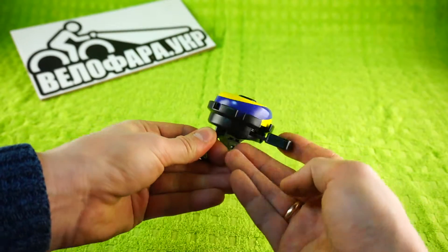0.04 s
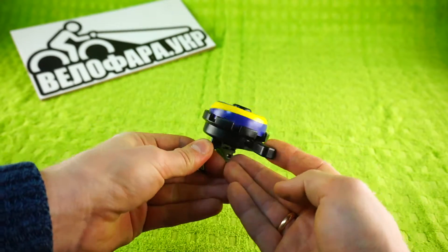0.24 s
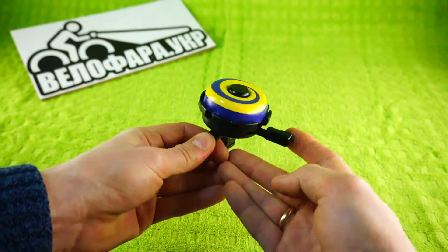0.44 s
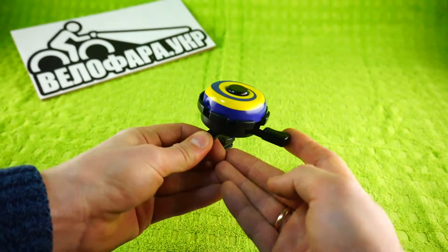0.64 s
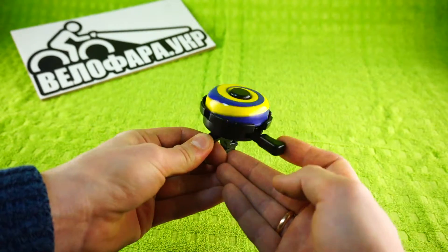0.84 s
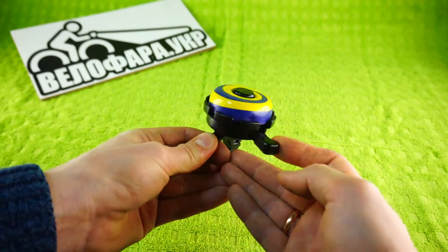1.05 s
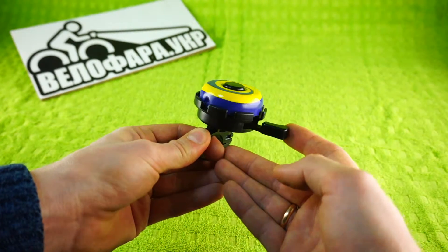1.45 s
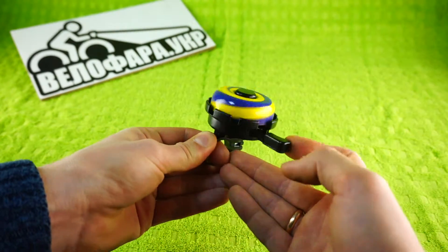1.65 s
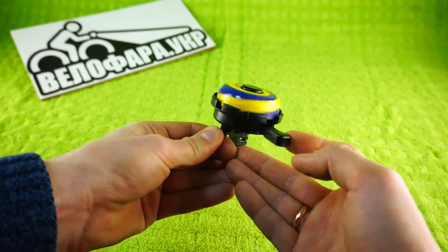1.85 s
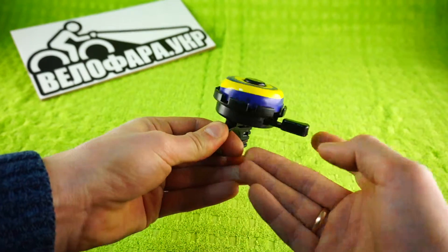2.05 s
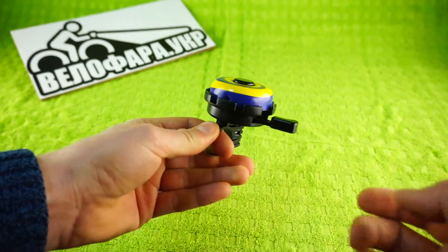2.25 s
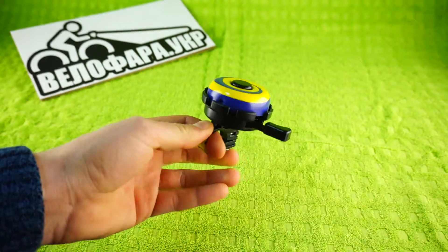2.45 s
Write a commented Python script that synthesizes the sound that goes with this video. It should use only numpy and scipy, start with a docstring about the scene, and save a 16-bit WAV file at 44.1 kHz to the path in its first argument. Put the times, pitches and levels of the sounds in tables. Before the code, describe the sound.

A small bicycle bell is rung three times by hand. Each push and return of the lever clacks and rattles the gears, setting off a bright, fluttering metallic ring, close to the microphone in a quiet room.

```python
"""A lever clacks and gear teeth rattle, then a small rotary bicycle bell rings out, three times in all,
hand-held in a quiet room. The lever spins the dome one way and its spring spins it back while a striker
hits it; the dome's tones flutter as their lobes turn past the microphones. The plastic housing colours
the clacks and scrapes, and a finger stills the dome before the third ring."""
import sys
import numpy as np
from scipy import signal
from scipy.fft import rfft, irfft, next_fast_len
from scipy.io import wavfile

SR = 44100
rng = np.random.default_rng(int(sys.argv[2]) if len(sys.argv) > 2 else 0)


def transcribe(signal):
    """Save signal, clipped to [-1, 1], as a 16-bit WAV file at the path in sys.argv[1]."""
    frames = np.atleast_2d(signal).T
    limited = np.clip(frames, -1, 1)
    pcm = np.round(limited * 32767).astype(np.int16)
    wavfile.write(sys.argv[1], SR, pcm)


N = 110250
TIME = np.arange(N) / SR


def from_db(db):
    """Decibels to gain."""
    return 10 ** (np.asarray(db) / 20)


def pan(db):
    """Left and right gains, the left louder by db."""
    return from_db(np.array([[db], [-db]]) / 2)


def stereo_noise(correlation):
    """White noise, partly shared by both channels."""
    mid, side = rng.standard_normal((2, N))
    spread = np.sqrt(1 - correlation) * side * np.array([[1], [-1]])
    return (np.sqrt(1 + correlation) * mid + spread) / np.sqrt(2)


def colour(x, eq):
    """Minimum-phase EQ that keeps the power of white noise."""
    size = next_fast_len(2 * N)
    hz, db = np.transpose(eq)
    bin_hz = np.arange(size // 2 + 1) * SR / size
    gain = from_db(np.interp(np.log(bin_hz + 1), np.log(hz), db))
    cepstrum = irfft(np.log(gain / np.sqrt(np.mean(gain ** 2))), size)
    cepstrum[1:size // 2] *= 2
    cepstrum[size // 2 + 1:] = 0
    return irfft(rfft(x, size) * np.exp(rfft(cepstrum)), size)[..., :N]


def hit_envelope(times, db, t60):
    """Amplitude of a vibration whose energy is topped up by each hit and then dies away."""
    energy = np.zeros(N)
    np.add.at(energy, np.clip((times * SR).astype(int), 0, N - 1), from_db(db) ** 2)
    decay = np.exp(-2 * np.log(1000) / (t60 * SR))
    return np.sqrt(signal.lfilter([1], [1, -decay], energy + 1e-22))


# Tone of the noise floor: (frequency [Hz], relative level [dB])
HISS_EQ = [(100, 5), (1000, -1), (4000, -6.5), (11000, -7)]
def room_hiss():
    """The quiet room's steady, wide bed of hiss."""
    return from_db(-83.5) * colour(stereo_noise(correlation=0.13), HISS_EQ)


def room_reverb(x, t60=0.53, wet_db=-20, predelay_s=0.004):
    """Reflections blur into a faint diffuse tail."""
    t = TIME[:SR // 2]
    tail = rng.standard_normal((2, len(t))) * np.exp(-np.log(1000) * t / t60) * (t > predelay_s)
    tail /= np.sqrt(np.sum(tail ** 2) / 2)
    return from_db(wet_db) * signal.fftconvolve(x, tail, axes=1)[:, :N]


# Fader ride of the hand rustle: (time [s], relative level [dB])
RUSTLE_RIDE = [(0.0, -61), (0.06, -62.5), (0.18, -52), (0.24, -73.5), (0.39, -64), (0.44, -77),
               (0.72, -91.5), (0.88, -68), (0.93, -78.5), (1.34, -94.5), (1.4, -87.5), (2.5, -96)]
# Its bass-heavy tone: (frequency [Hz], relative level [dB])
RUSTLE_EQ = [(25, -28), (70, -16), (135, -9), (160, -9.5), (173, 10.5), (188, -5.5), (270, -1), (400, -16),
             (700, -20), (1500, -17.5), (4000, -35)]
def hand_rustle(trim_db=-2.5):
    """Low rustle of the hands holding the bell."""
    level = from_db(np.interp(TIME, *np.transpose(RUSTLE_RIDE)) + trim_db)
    return level * colour(stereo_noise(correlation=0.74), RUSTLE_EQ)


HOUSING_PAN_DB = -3
# Resonances of the housing: (frequency [Hz], relative level [dB])
HOUSING_EQ = [(100, -48), (650, -35.5), (950, -22), (1250, -16.5), (1500, -1.5), (1750, 10), (2150, -10.5),
              (2600, -10.5), (3100, -23.5), (3600, -23), (3900, -0.5), (4250, -12), (4550, -14),
              (5200, -6.5), (5900, -22.5), (6750, -4.5), (7300, -15), (8700, -9), (9600, -5), (10200, -13),
              (10900, -15.5)]
def housing(x):
    """The plastic shell lends its resonances to the mechanism inside."""
    return colour(x, HOUSING_EQ)


# Lever rubs leading into a strike: (start [s], end [s], end level [dB])
SCRAPES = [(0.109, 0.201, -50), (0.346, .4, -46.5), (.8, .915, -53.5), (1.102, 1.158, -54.5),
           (1.63, 1.72, -53.5)]
def lever_scrapes(swell_db=13, lowpass_hz=2464):
    """Dull friction of the lever in the housing, swelling and then cutting off."""
    level = np.zeros(N)
    for start, end, db in SCRAPES:
        rubbing = (TIME > start) & (TIME < end)
        level[rubbing] += from_db(db - swell_db * (end - TIME[rubbing]) / (end - start))
    lowpass = signal.butter(1, lowpass_hz, fs=SR, output="sos")
    rub = signal.sosfilt(lowpass, housing(stereo_noise(correlation=0.39)))
    return pan(HOUSING_PAN_DB) * level * rub / rub.std()


# Ringing of the small metal parts: (frequency [Hz], level against the clack [dB], t60 [s])
METAL_PARTS = [(4034, -44.5, 0.66), (6860, -46.5, 0.17), (9100, -48, 0.42)]
def metal_parts(clacks, width_hz=250):
    """Each clack shakes clusters of close, weak modes, voiced as narrow bands of noise."""
    times, clack_db, _ = np.transpose(clacks)
    noise = stereo_noise(correlation=0.12)
    radius = np.exp(-np.pi * width_hz / SR)
    out = 0
    for hz, db, t60 in METAL_PARTS:
        resonator = [1, 0, -1, 1, -2 * radius * np.cos(2 * np.pi * hz / SR), radius ** 2]
        cluster = signal.sosfilt([resonator, resonator], noise)
        out += cluster / cluster.std() * hit_envelope(times, clack_db + db, t60)
    return pan(HOUSING_PAN_DB) * out


# Dome speed, one table per push and return of the lever: (time [s], signed speed [turns/s])
FIRST_SPIN = [(0.105, -1), (0.113, 10), (0.23, 11.5), (0.263, 9), (0.29, 0.63), (0.345, -6), (0.422, -23),
              (0.44, -25), (0.476, -3), (0.53, -0.5)]
SECOND_SPIN = [(0.772, 0), (0.827, 0.4), (0.897, 12.5), (0.953, 11), (1.05, -1.44), (1.116, -8),
               (1.225, -23.5), (1.232, -6.5), (1.322, -5), (1.37, -2.2), (1.47, -1.1), (1.6, 0)]
THIRD_SPIN = [(1.66, -0.5), (1.714, 15.5), (1.772, 18), (1.819, -5), (1.938, -17.5), (1.959, -24),
              (1.976, -4.5), (2.08, -1)]
def dome_spins():
    """One speed curve per ring: the lever drives the dome forward, the spring drives it back."""
    return [np.interp(TIME, *np.transpose(rows), left=0, right=0)
            for rows in (FIRST_SPIN, SECOND_SPIN, THIRD_SPIN)]


def gear_ticks(spin, level_db, teeth_per_turn=9, reference_speed=18, scatter_db=6, tilt_db=-6.5):
    """Each passing tooth cues a tick, harder with speed; columns as in CLACKS."""
    speed = np.abs(spin)
    teeth_passed = np.floor(np.cumsum(speed) / SR * teeth_per_turn)
    at = np.flatnonzero(np.diff(teeth_passed))
    scatter, jitter = rng.standard_normal((len(at), 2)).T
    speed_db = 0.54 * 20 * np.log10(speed[at] / reference_speed + 1e-6)
    db = level_db + speed_db + scatter_db * scatter
    return np.column_stack([at / SR + 0.0014 * jitter, db, np.full(len(at), tilt_db)])


# Hits of lever and striker: (time [s], relative level [dB], treble tilt [dB])
CLACKS = [(.1067, -31.5, 4.5), (.1935, -29, -5), (.199, -30, 0), (.208, -30, 0), (.395, -45, -1.5),
          (.402, -32.5, 6), (.413, -61, 4), (.4505, -30, 6.5), (.4618, -25, 7), (.51, -35, 0),
          (.546, -51.5, 5.5), (.778, -42, 0.5), (.792, -43.5, -2), (.9155, -29.5, -2), (1.159, -32, 0),
          (1.2146, -32, 5.5), (1.225, -40.5, 6.5), (1.2535, -35, 4.5), (1.3244, -42.5, 5),
          (1.344, -40.5, 2), (1.398, -55, -2.5), (1.4511, -53, 5.5), (1.535, -56, -6.5),
          (1.565, -52.5, -2.5), (1.625, -47.5, -1.5), (1.719, -31.5, -2), (1.729, -39.5, -2),
          (1.78, -42, -4.5), (1.789, -47.5, 13.5), (1.82, -36, -1), (1.911, -32, 0), (1.963, -28.5, 1.5),
          (1.9784, -28, 7), (2.0687, -52, 7.5), (2.4488, -50, -9.5)]
def clacks_and_rattle(ticks, trim_db=-4, crossover_hz=3500):
    """Every clack and gear tick is a short crack with a weaker ring, heard through the housing."""
    times, db, tilt_db = np.vstack([CLACKS, *ticks]).T
    noise = stereo_noise(correlation=0.53)
    low = signal.sosfilt(signal.butter(1, crossover_hz, fs=SR, output="sos"), noise)
    out = 0
    for band, band_db in ((low, db - tilt_db), (noise - low, db + tilt_db)):
        crack = hit_envelope(times, band_db + trim_db, t60=0.017)
        ring = hit_envelope(times, band_db + trim_db - 9, t60=0.094)
        out += band * np.hypot(crack, ring)
    return pan(HOUSING_PAN_DB) * housing(out)


def waver(depth_db=2.2, rate_hz=7):
    """A tone's level wavers at random, differently in each channel."""
    lowpass = signal.butter(2, rate_hz, fs=SR, output="sos")
    drift = signal.sosfilt(lowpass, rng.standard_normal((2, N + SR)))[:, SR:]
    return from_db(depth_db * (drift - drift.mean(axis=1, keepdims=True)) / drift.std())


def finger_mute(struck_at, touch_s=1.5547, press_s=0.054, loss_db=26):
    """Gain in dB as a finger chokes the dome until the next strike."""
    return -loss_db * np.clip((TIME - touch_s) / press_s, 0, 1) * (struck_at < touch_s)


# The dome's low, middle and high partials: (t60 [s], left gain [dB], left microphone bearing [turns],
# right microphone bearing [turns], reflected sound in the gaps between lobes [signed share])
PARTIALS = [(3.5, 6.5, .124, -0.0096, 0.22), (2.34, -15.5, -0.053, -0.1228, -0.22),
            (0.6, -10, 0.3, 0.257, 0.24)]
# Their pitches, the low one without a twin: (tone [Hz], twin [Hz])
PARTIAL_HZ = [(2002,), (4763.9, 4836), (8153.2, 8317.5)]
WAVES_ROUND_RIM, PARTIAL_TRIM_DB, ATTACK_S = (2, 3, 4), (-2, 1, 1.5), 0.00044
# Slow swells and dips of two partials: (time [s], low gain [dB], middle gain [dB])
SWELLS = [(0.2, -1, -0.5), (0.49, -4.1, 0), (0.652, 3, -1.5), (0.852, 9.5, 5), (0.95, -4, -4.5),
          (1.25, -9, -1.5), (1.472, 2.4, -4.5), (1.55, 2.4, 1), (1.72, 6.1, -3.4), (2.05, -5.7, -1),
          (2.199, -4.6, 5.5), (2.33, 1.5, 3.5), (2.5, 1.6, -2)]
# Striker hits, in relative levels: (time [s], low [dB], middle [dB], twin [dB], high [dB], twin [dB])
STRIKES = [(.199, -40, -26, -25, -20.5, -18.5), (.402, -45.5, -37, -32.5, -25.5, -31),
           (0.461, -36.5, -30.5, -29, -27.5, -26), (.916, -38.5, -26, -23, -30, -24),
           (1.158, -45.5, -33.5, -24.5, -29, -23.5), (1.215, -37.5, -33.5, -27.5, -23.5, -24.5),
           (1.251, -39.5, -25, -38.5, -32.5, -31), (1.72, -53.5, -29.5, -27, -35.5, -23),
           (1.78, -50.5, -23.5, -24, -33.5, -27), (1.82, -48.5, -24.5, -28, -35, -44.5),
           (1.91, -44, -28, -29.5, -37.5, -27.5), (1.965, -45.5, -25, -31, -28, -36.5)]
def dome(spin):
    """Each strike restarts the rim modes; their lobes sweep past each microphone as the dome turns."""
    strike_times, *tone_levels = np.transpose(STRIKES)
    tone_levels = iter(tone_levels)
    latest = np.maximum(np.searchsorted(strike_times, TIME) - 1, 0)
    age = np.maximum(TIME - strike_times[latest], 0)
    mute_db = finger_mute(strike_times[latest])
    swell_times, *swells = np.transpose(SWELLS)
    swell_db = [np.interp(TIME, swell_times, db) for db in swells] + [0]
    turns = np.cumsum(spin) / SR
    attack_pole = np.exp(-1 / (ATTACK_S * SR))
    out = 0
    for i, (t60, left_db, left_bearing, right_bearing, reflected) in enumerate(PARTIALS):
        decay = np.exp(-np.log(1000) * age / t60) * (age > 0)
        envelope = decay * from_db(PARTIAL_TRIM_DB[i] + swell_db[i] + mute_db)
        bearing = turns + np.array([[left_bearing], [right_bearing]])
        for twin, hz in enumerate(PARTIAL_HZ[i]):
            struck = envelope * from_db(next(tone_levels))[latest]
            level = signal.lfilter([1 - attack_pole], [1, -attack_pole], struck)
            # the twin's lobes lie in the gaps between those of the first mode
            lobe = 2 * np.pi * WAVES_ROUND_RIM[i] * bearing - twin * np.pi / 2
            phase = 2 * np.pi * hz * TIME
            tone = np.cos(lobe) * np.cos(phase) - reflected * np.sin(lobe) * np.sin(phase)
            out += from_db([[left_db], [0]]) * level * waver() * tone
    return out


def scene():
    """The bell and its mechanism up front, over a little reverb, rustle and hiss."""
    spins = dome_spins()
    ticks = [gear_ticks(spin, level_db) for spin, level_db in zip(spins, (-49, -56.5, -55))]
    mechanism = clacks_and_rattle(ticks) + lever_scrapes()
    bell = dome(sum(spins))
    reverb = room_reverb(mechanism + 0.87 * bell)
    return room_hiss() + reverb + hand_rustle() + metal_parts(CLACKS) + mechanism + bell


def record(dry, cutoff_hz=11150):
    """A steep high cut on the whole mix."""
    return signal.sosfilt(signal.ellip(12, .1, 80, cutoff_hz, fs=SR, output="sos"), dry)


dry = scene()
out = record(dry)
transcribe(out)
```